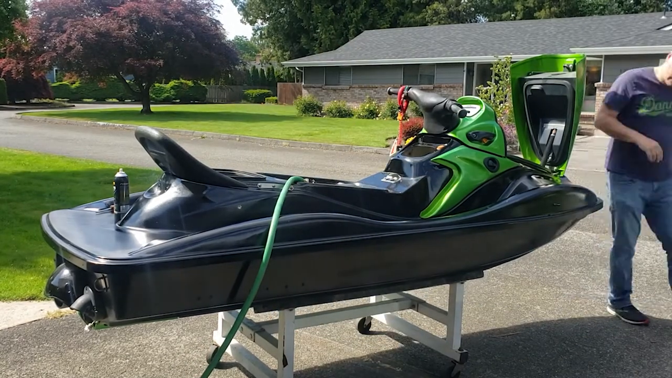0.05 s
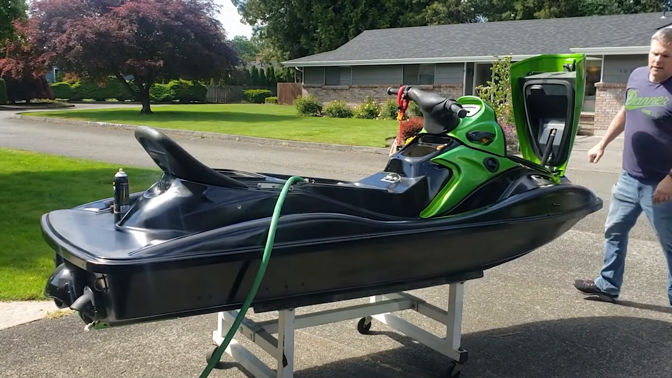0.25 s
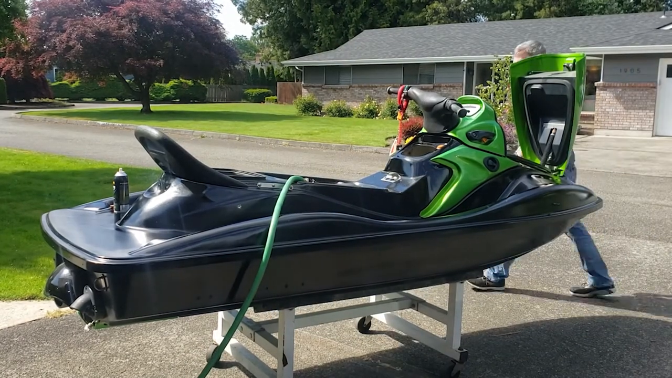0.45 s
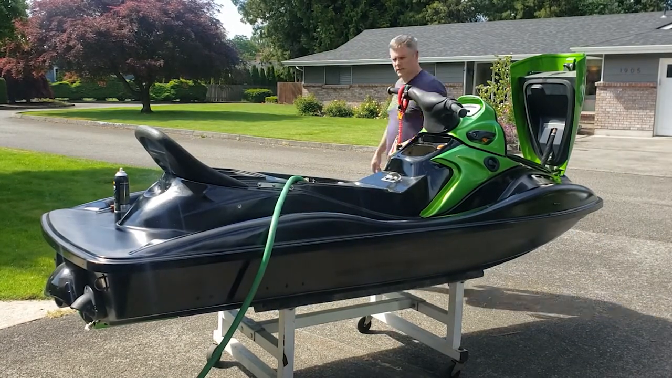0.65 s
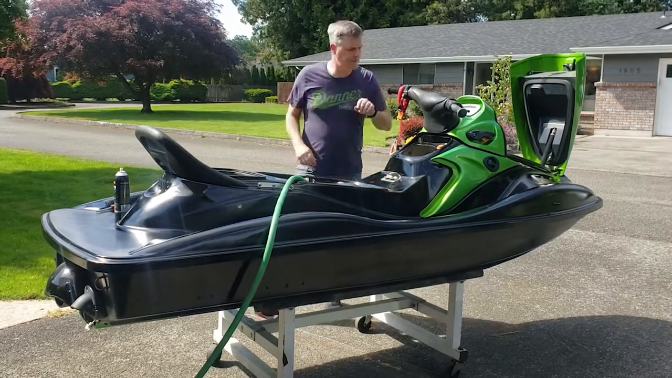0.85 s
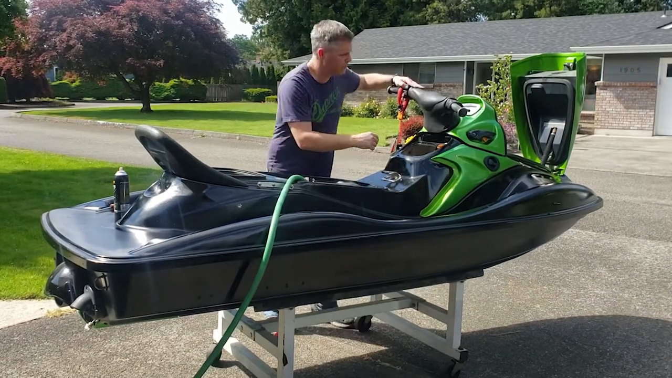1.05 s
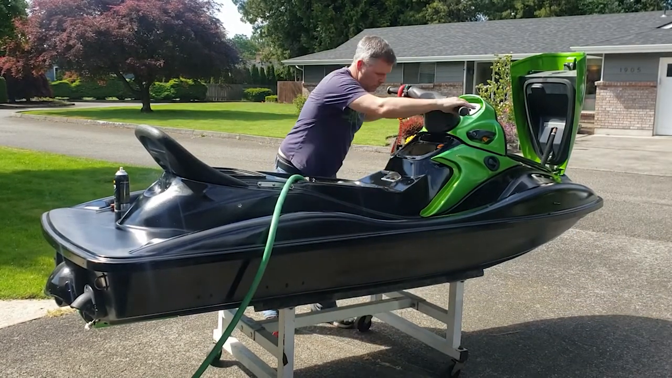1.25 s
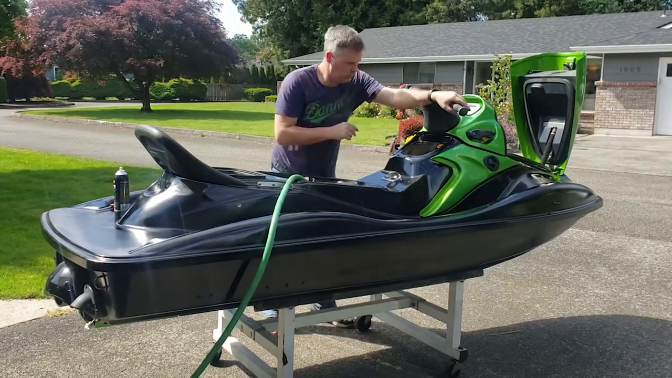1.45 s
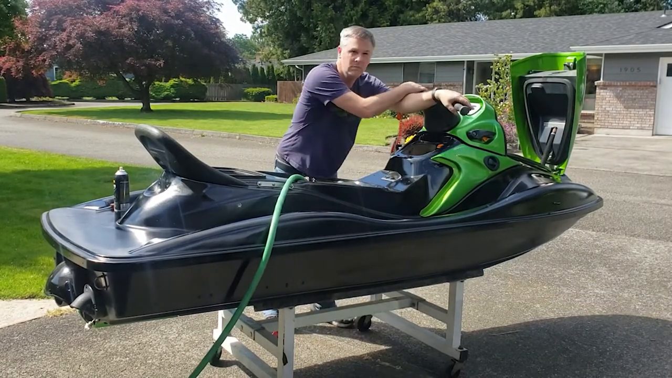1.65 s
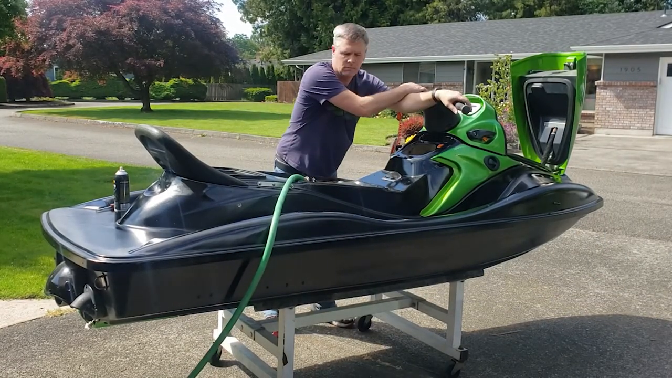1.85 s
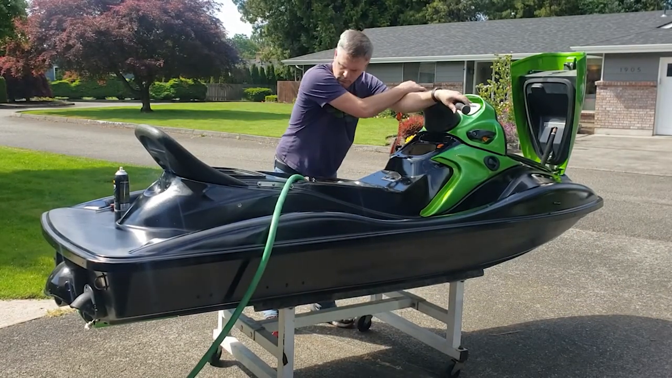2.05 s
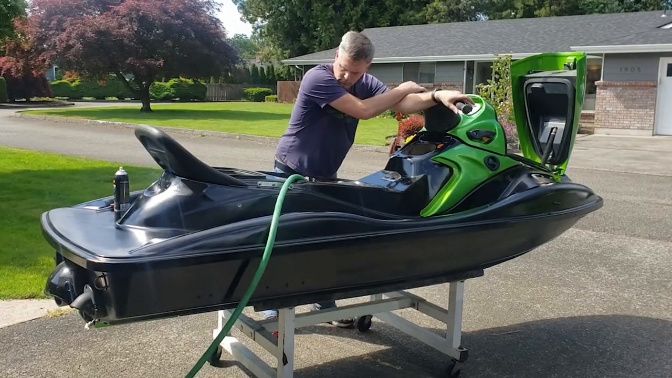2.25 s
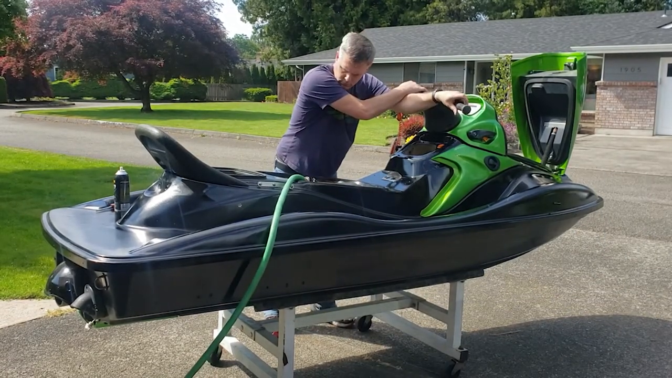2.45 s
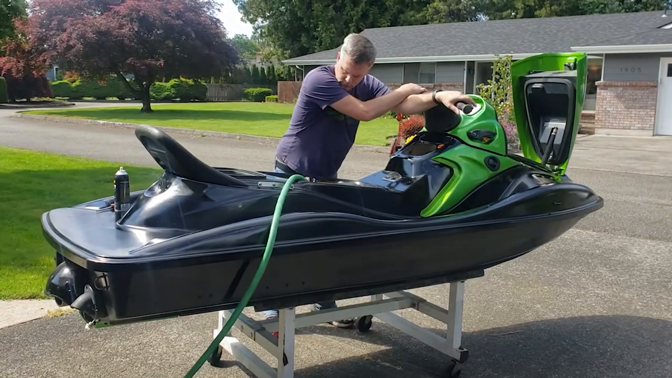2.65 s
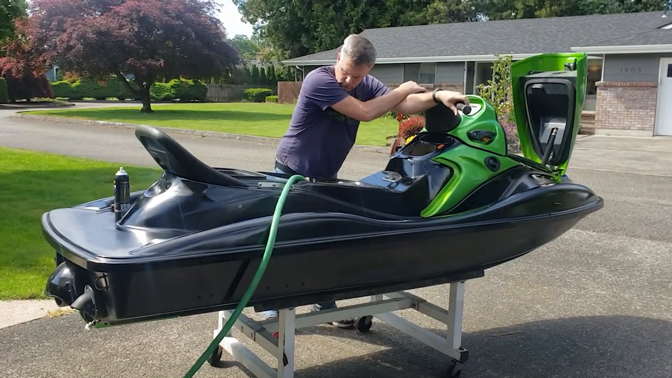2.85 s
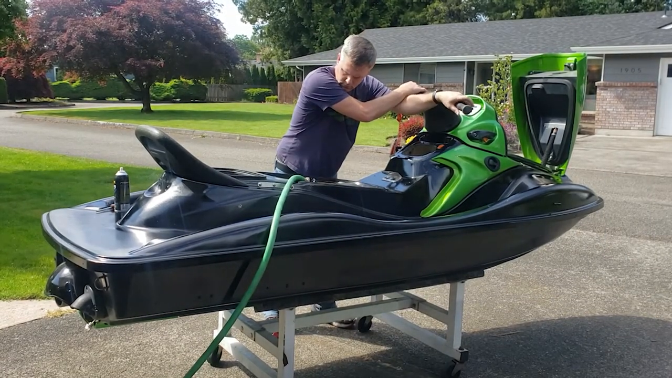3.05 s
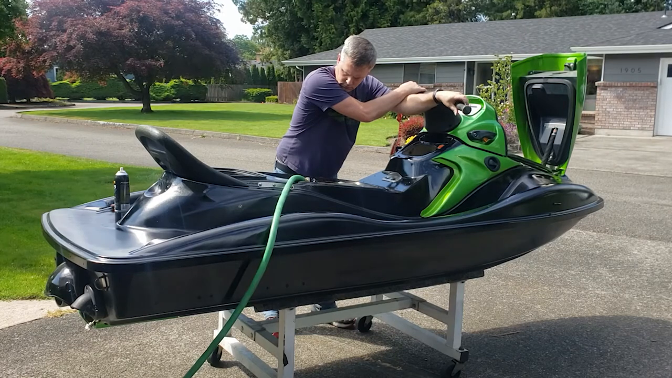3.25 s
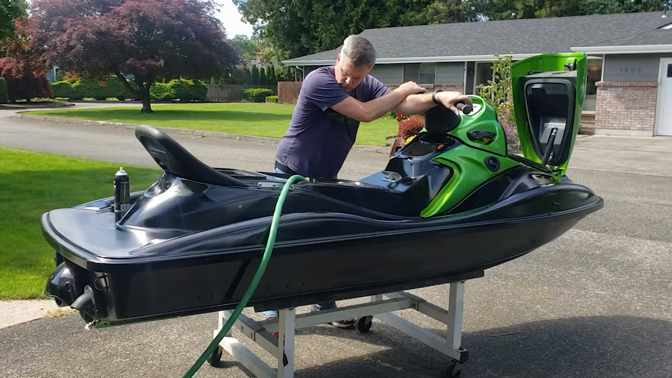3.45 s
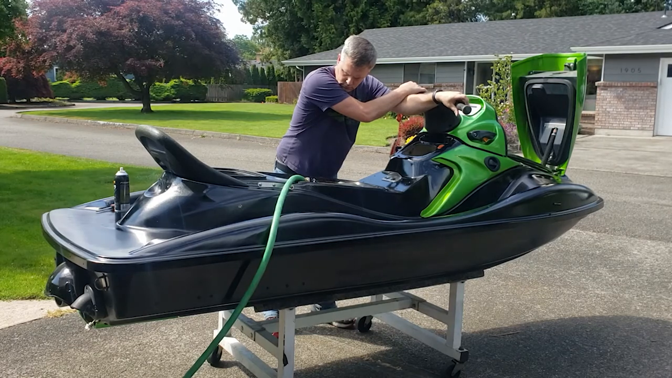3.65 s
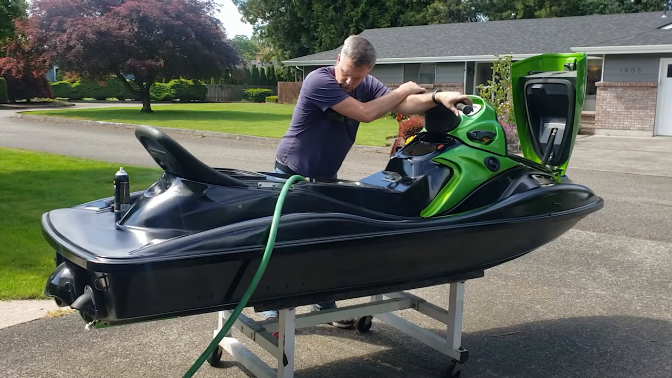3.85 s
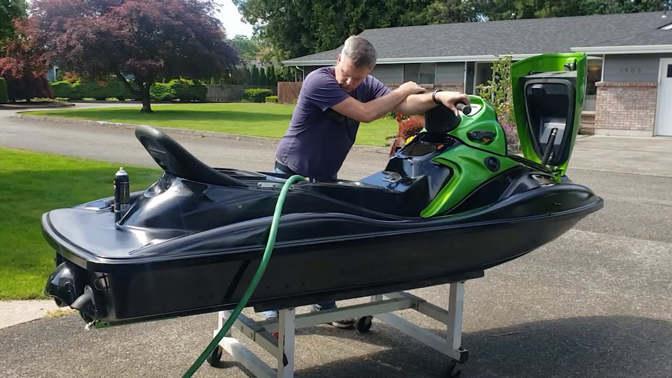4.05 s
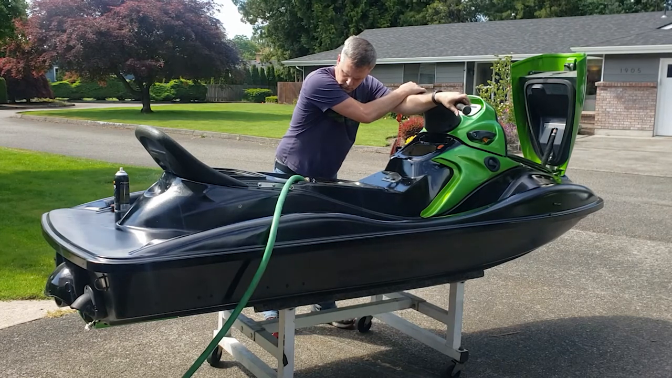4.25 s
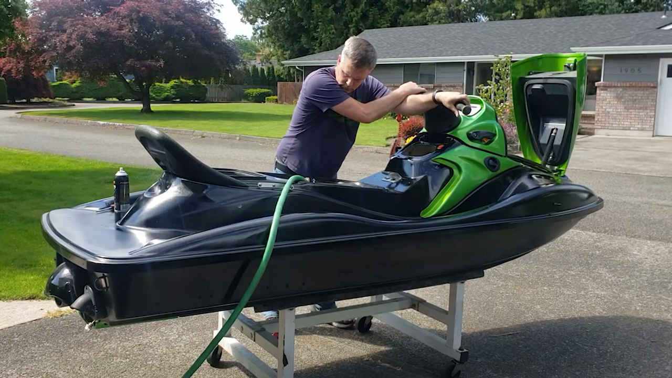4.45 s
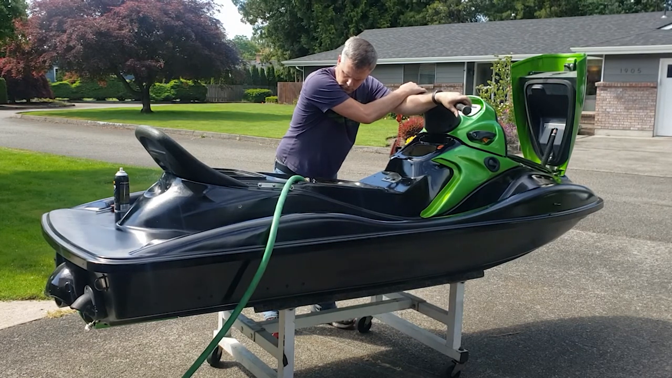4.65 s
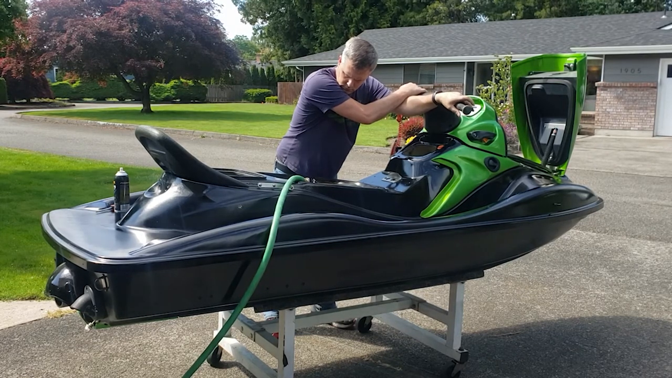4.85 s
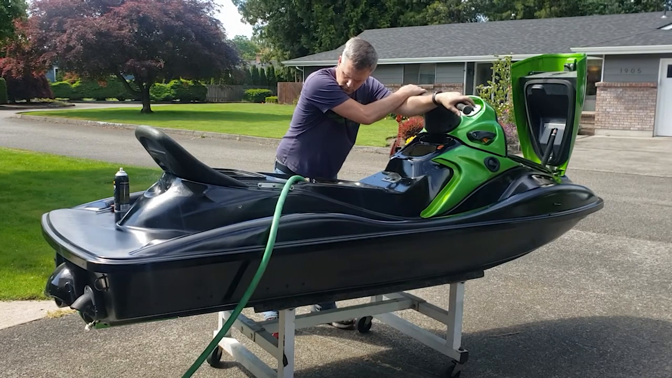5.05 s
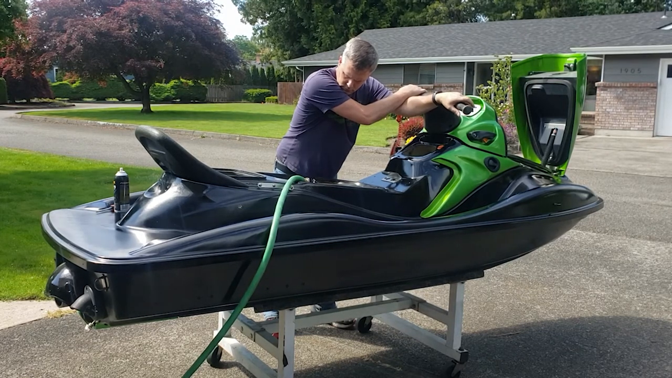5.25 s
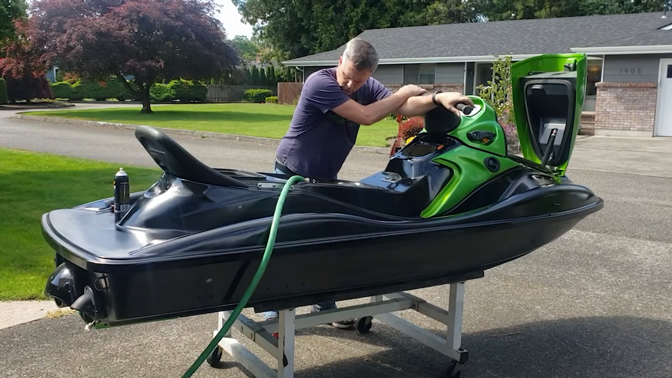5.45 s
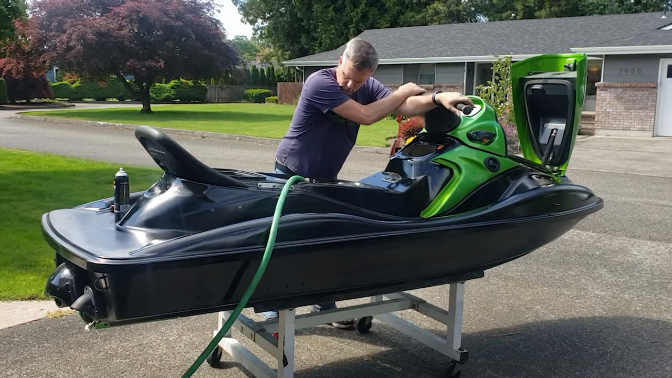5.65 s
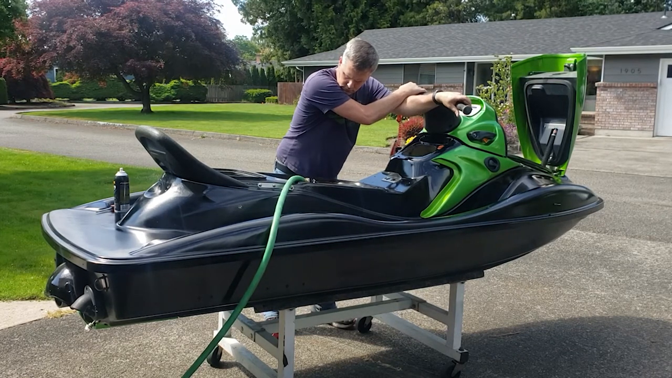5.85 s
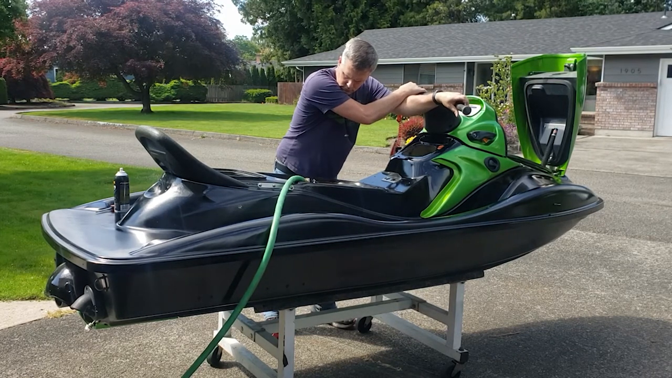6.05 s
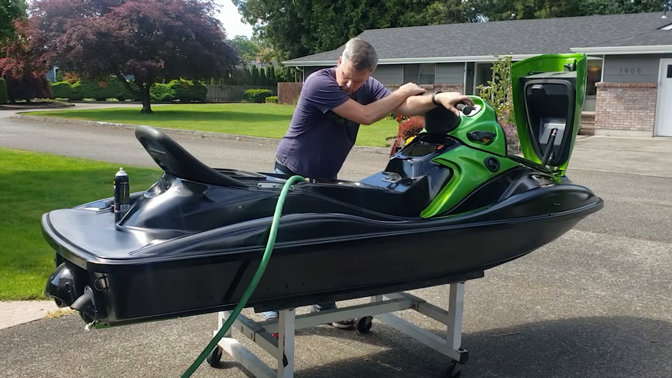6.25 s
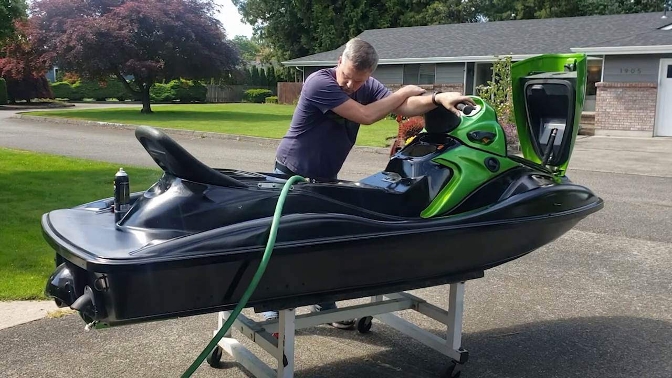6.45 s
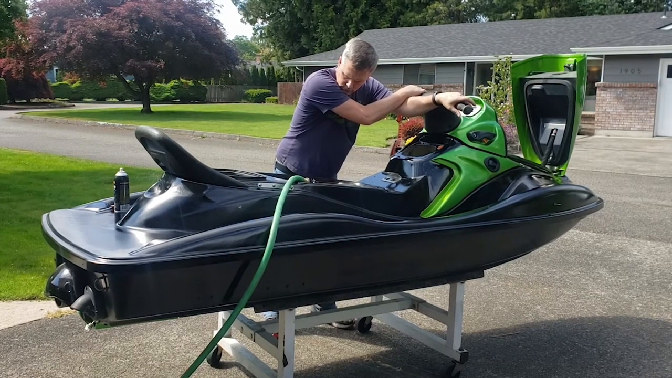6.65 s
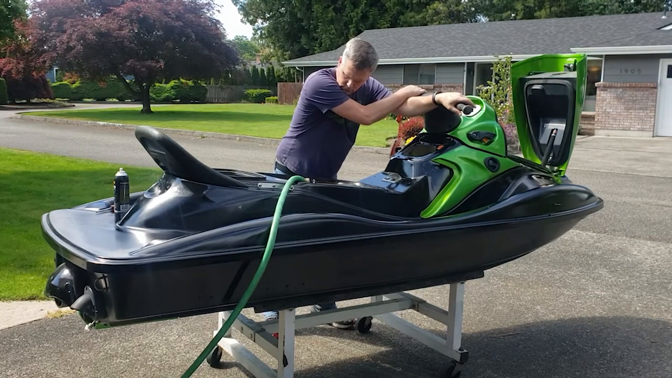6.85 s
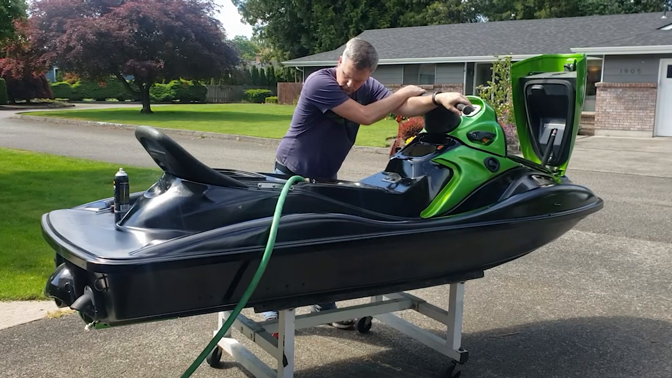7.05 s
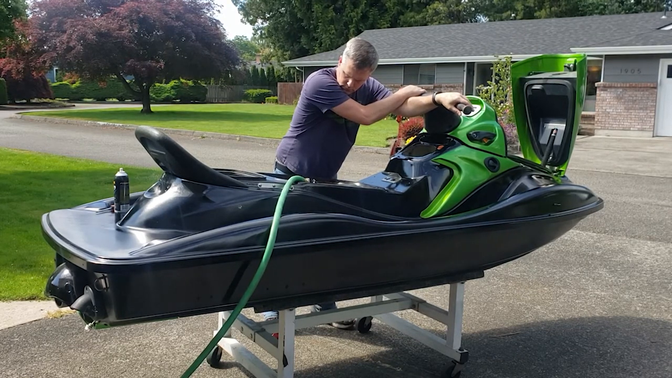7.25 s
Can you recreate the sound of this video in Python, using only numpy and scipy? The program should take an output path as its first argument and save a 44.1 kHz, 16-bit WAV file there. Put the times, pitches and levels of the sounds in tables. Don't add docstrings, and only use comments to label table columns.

```python
import sys
import numpy as np
from scipy import signal
from scipy.fft import rfft, irfft, next_fast_len
from scipy.io import wavfile
from scipy.ndimage import uniform_filter1d

SR = 44100
rng = np.random.default_rng(int(sys.argv[2]) if len(sys.argv) > 2 else 0)


def invert_db(x):
    u = np.asarray(x, float) / 20
    return 10 ** u


def materialize(psi):
    bounded = np.clip(np.atleast_2d(psi).T, -1, 1)
    quanta = np.round(bounded * 32767).astype(np.int16)
    wavfile.write(sys.argv[1], SR, quanta)


N = 322364

T = np.arange(N) / SR
SLOW_T = T[::64]
HZ = np.fft.rfftfreq(next_fast_len(N + SR // 5, True), 1 / SR) + 1e-3
SIZE = 2 * len(HZ) - 2

# t/s, level/dB, half length/s
GUSTS = [
    (0.065, -44, 0.044),
    (0.196, -35.5, 0.025),
    (0.29, -36.5, 0.034),
    (0.52, -43.5, 0.15),
    (0.8, -42, 0.053),
    (0.958, -45.5, 0.068),
    (1.626, -38, 0.013),
    (1.96, -43.5, 0.027),
    (2.045, -45, 0.075),
]
# t/s, level/dB, half length/s
SCUFFS = [
    (.27, -77, 0.12),
    (.52, -82, .03),
    (.82, -81, 0.035),
    (.98, -80, 0.033),
]
# f/Hz, level/dB
HUM_SPECTRUM = [(71, -45), (120, -3), (203, -17.5), (330, -23.5), (428, -25), (1060, -28), (1470, -38.5),
                (3650, -52.5), (4120, -65), (15000, -65)]
# t/s, level/dB
HUM_DB = [(0, 2), (1, 3.5), (1.45, -7), (2.8, -4.5), (5.4, -3), (7.31, 0)]
# t/s, peak level/dB, centre f/Hz, t60/s
TICKS = [(0.141, -66, 1500, .04), (0.151, -51, 1760, 0.035), (0.168, -57, 2356, 0.035),
         (0.351, -55, 2180, 0.046), (0.519, -60, 1860, 0.044), (0.7885, -46.5, 2900, 0.06),
         (0.955, -40.5, 3500, 0.017), (0.9714, -57, 3390, 0.053), (1.0604, -35, 1780, 0.12),
         (1.2072, -22.5, 1980, 0.042), (1.4084, -47, 1790, 0.033), (1.5252, -58, 1950, 0.032),
         (1.67, -43, 1655, 0.043), (1.9784, -39, 1730, 0.075), (2.812, -59, 2400, 0.044),
         (5.1686, -47, 2200, 0.036), (5.605, -34.5, 1850, 0.058), (6.22, -26, 1760, 0.047),
         (1.723, -35, 1433, 0.035), (2.043, -30, 2730, 0.051), (2.815, -34.5, 1500, 0.095),
         (6.181, -24.5, 1250, 0.18), (6.235, -20, 1196, 0.053)]
# t/s, peak level/dB
SPITS = [(0.1396, -69), (0.1511, -58), (0.1674, -58), (0.3526, -62), (0.5184, -64), (0.7884, -55),
         (0.954, -52), (1.5244, -87), (1.7045, -47), (1.7225, -42.5), (1.7928, -39.5), (1.8422, -39.5),
         (1.8891, -38), (2.0702, -48), (2.2044, -39), (3.0634, -34), (3.165, -38), (5.1692, -37.5),
         (5.1944, -47), (5.7453, -44), (5.9873, -39.5)]

# t/s, angle/turns
TURNS = [(1.06, 0), (1.208, 3), (1.725, 11), (1.892, 14), (2.046, 17), (2.167, 19), (2.434, 23),
         (2.609, 26), (2.909, 31), (3.398, 41), (3.492, 43), (4.269, 59), (4.361, 61), (4.454, 63),
         (4.936, 73), (4.995, 74), (5.049, 75), (5.155, 77), (5.6, 83.3), (5.738, 85), (5.821, 86),
         (6.081, 91), (6.6, 100.6), (6.87, 106.2), (7.05, 110.14), (7.35, 116.59)]
# on t/s, off t/s, level/dB, spin-up/s, coast for 30 dB/s
CRANKS = [
    (1.054, 1.307, -1, .05, 0.0787),
    (1.668, 1.915, -7, .05, .05),
    (1.978, 2.665, -3, .08, .075),
    (2.81, 4.99, 0, .04, 0.4153),
    (5.605, 6.1, -1, .27, 0.2),
]
# on t/s, off t/s, level/dB, spin-up/s, coast for 30 dB/s
KICKS = [
    (1.4, 1.404, -8, 0.0073, 0.048),
    (5.153, 5.194, -1.5, 0.042, 0.11),
    (5.757, 5.805, -4, 0.0095, 0.05),
]
# on t/s, off t/s, level/dB, spin-up/s, coast for 30 dB/s
BURNS = [
    (1.105, 1.14, -5.5, 0.0068, 0.25),
    (1.19, 1.26, -3, 0.007, 0.14),
    (2.05, 2.075, -6.5, 0.019, 0.026),
    (6.095, 7.4, -0.5, 0.018, .1),
    (6.2, 6.29, -0.5, 0.0069, .2),
]
# t/s, depth level/dB, half length/s
STUMBLES = [
    (3.462, 8.5, 0.014),
    (4.33, 4.5, 0.018),
    (4.981, 1.5, 0.032),
    (5.135, 3.5, .015),
    (5.795, 6, 0.012),
    (6.026, -0.5, 0.022),
]
CRANK_DB = [-33, -34.5, -41.5, -52]
BURN_DB = [-26.5, -31, -37, -45.5]
LAG_DB = [21.5, 19.4, 5.7, 14]
COAST = [1.37, 1, 1.05, 1.22]
STUMBLE_SHARE = [0.061, 0.91, 1.14, 1.1]
SHAKE = [0.44, 0.5, 0.33, 0.89, 0.72]
PUFFS_DB = [2, -1, 0.5, -0.5, -37, -1, 1, -11, -6]
# f/Hz, width/Hz, level/dB
COLD_PIPE = [(63.4, 23, -7.5), (86.6, 37, -8.5), (96.3, 18, 6), (109, 10.7, 5)]
# f/Hz, width/Hz, level/dB
HOT_PIPE = [(51, 13, -28), (121, 33, -7)]
# f/Hz, width/Hz, level/dB
HULL = [(158, 21, -6), (198.3, 13.3, -5.5), (228, 19.4, 0), (252.7, 16.7, 0), (281, 19.2, -5),
        (313.7, 5.3, -4.5), (343.2, 8.7, -4.5), (431, 102, -15.5)]
# order/shaft rate, level/dB
CHUG_ORDERS = [(1, -40), (2, -10), (3, 1.5), (4, 4.5), (5, 5), (6, -3), (7, -39), (8, -9.5), (9, -12),
               (10, -1), (11, -1.5), (12, -42), (13, -5.5), (14, -5.5), (15, -7), (16, -12.5), (17, -7),
               (21, -16.5), (26, -15), (32, -21.5)]
# order/shaft rate, level/dB
FIRING_ORDERS = [(1, -35.5), (2, -10), (3, 9.5), (4, -12), (5, 5.5), (6, -1.5), (7, -0.5), (8, -17),
                 (9, -34), (10, -7), (11, -8.5), (12, -0.5), (13, -32), (14, -16), (15, -7.5), (16, -5),
                 (17, -10.5), (18, -36), (19, -12), (20, -6.5), (21, -40), (22, -19), (23, -51), (24, -39),
                 (25, -10.5), (26, -47), (27, -29), (28, -6), (29, -12), (30, -9)]
# f/Hz, width/Hz, level/dB
CRANKED_CASING = [
    [(240, 4), (400, -29), (488, 3), (527, 5.5), (1020, -2.5), (1380, -4), (1880, -2), (2060, -6), (2760, -11), (3420, -16.5), (6420, -19.5), (7360, -20.5), (15600, -26.5)],
    [(530, 20, -1.5), (1119, 28, 5.5), (1413, 35, -11), (1897, 19, 16), (2600, 24, -3), (3120, 32, -46), (3823, 22, -5), (4100, 72, -11), (4216, 33, -7), (5254, 25, -45), (6050, 57, -1), (6800, 69, -4), (7470, 260, -4), (8650, 260, -8.5), (11500, 92, -7)],
]
# f/Hz, width/Hz, level/dB
RUNNING_CASING = [
    [(240, -29), (400, -5), (614, -2.5), (973, -8.5), (1280, -10), (1690, -14.5), (1880, -12.5), (2030, -15), (4440, -25), (6930, -26), (9410, -31.5), (11500, -28), (15600, -33.5)],
    [(1315, 42, 1.5), (1850, 13, 7), (1902, 13, 5.5), (2178, 12, 3), (2630, 66, -1), (4600, 38, -10.5), (5150, 64, -19), (5850, 17, -14.5), (5900, 30, -18), (6740, 21, -2.5), (7330, 26, -11), (6870, 87, -26), (8470, 19, -14), (8880, 58, -20), (12800, 54, -14), (11100, 36, -13), (11600, 21, -10), (12600, 87, -17), (13400, 48, -19), (13700, 31, -23)],
]
# multiple/mesh rate, level/dB
WHINE_ORDERS = [(2, -14), (3.15, 0), (3.998, -26), (6, -0.5)]
WHINE_DB = [-56, -61, -55.5, -50, -48.5]
WHINE_SAG = [.04, .03, .015, .04, .055]
# t/s, level/dB, from f/Hz, to f/Hz, length/s
SQUEALS = [(1.69, -50, 2330, 2385, 0.021), (1.76, -51, 2333, 2420, 0.019),
           (1.781, -46.5, 2610, 2725, 0.014), (1.771, -53, 1897, 1850, 0.07),
           (1.831, -54.5, 2290, 2348, 0.037), (1.999, -45.5, 1420, 1444, 0.02),
           (2.022, -46, 2526, 2393, 0.015), (2.064, -40.5, 1810, 1850, 0.017),
           (1.071, -51, 1725, 1850, 0.028), (1.083, -45, 2360, 2462, 0.049),
           (2.819, -48, 2420, 2496, 0.032), (5.084, -57, 4100, 4140, 0.05), (5.118, -56, 2980, 2927, 0.028),
           (5.165, -60, 2230, 2150, 0.041), (5.64, -58, 2523, 2600, 0.018), (5.658, -45, 1523, 1503, 0.029),
           (5.664, -56, 714, 844, 0.024), (5.688, -48, 1672, 1800, 0.022), (5.7, -51, 2303, 2330, 0.023),
           (5.733, -41, 2457, 2284, 0.025), (5.753, -46, 2170, 2010, .035), (5.76, -58, 1154, 957, 0.027),
           (5.786, -45.5, 2263, 2400, 0.019), (6.099, -44, 1930, 1850, 0.019)]
# t/s, level/dB
THUDS = [
    (1.128, -14.5),
    (1.142, -15.5),
    (1.168, -12),
    (1.19, -11),
    (1.26, -18),
    (1.345, -21),
    (1.371, -28),
    (2.075, -15.5),
    (2.588, -21),
]
# on t/s, off t/s, f/Hz, level/dB
BOOMS = [(1.129, 1.183, 112.7, -33), (1.241, 1.242, 106, -31), (1.308, 1.31, 101.3, -15),
         (2.076, 2.081, 128, -22.5), (6.109, 6.169, 109, -14), (6.252, 6.318, 107.3, -20),
         (6.336, 6.427, 106.4, -21), (6.413, 6.497, 116.5, -23.5), (6.567, 6.652, 118.6, -20.5),
         (6.674, 6.714, 115, -24.5), (6.774, 6.865, 112, -28.5)]
# t/s, peak level/dB, f/Hz
LABOURED_SLACK = [(2.128, -51, 2850), (2.1667, -41, 2720), (2.225, -42, 2700), (2.2989, -40, 2750),
                  (2.3406, -36, 2710), (2.3887, -42, 2710), (2.433, -40, 2670), (2.484, -41, 2780),
                  (2.536, -39, 2690), (2.595, -44, 2740), (2.6441, -48, 2350)]
# t/s, peak level/dB, f/Hz
STEADY_SLACK = [(2.8483, -54, 2480), (2.9082, -36, 2680), (2.9563, -39, 2720), (3.006, -35, 2920),
                (3.0565, -33, 2670), (3.1038, -42, 2660), (3.15, -38, 2520), (3.202, -37, 2760),
                (3.2494, -33, 2720), (3.299, -34, 2500), (3.3487, -35, 2730), (3.3963, -32, 2770),
                (3.4914, -40, 2800), (3.539, -56, 2890), (3.586, -33, 2800), (3.635, -34, 2780),
                (3.6839, -41, 2800), (3.7322, -37, 2930), (3.7812, -36.5, 2730), (3.8294, -39, 2720),
                (3.877, -40, 2680), (3.926, -37, 2740), (3.975, -38, 2730), (4.0237, -31, 2930),
                (4.0726, -40, 2720), (4.1224, -36.5, 2660), (4.169, -38, 2460), (4.219, -44, 2850),
                (4.269, -48, 2740), (4.36, -46, 2760), (4.4123, -52, 2440), (4.4507, -41, 3000),
                (4.5026, -45, 2680), (4.5487, -39, 2740), (4.5976, -36, 2470), (4.647, -40, 2780),
                (4.6925, -40, 2810), (4.7414, -35, 2650), (4.792, -36, 2800), (4.84, -38, 2670),
                (4.8905, -35, 2500), (4.9356, -40, 2560), (4.994, -49, 2730), (5.0477, -43, 2300),
                (5.1506, -55, 2430)]
# t/s, peak level/dB, f/Hz
LAST_SLACK = [
    (5.7197, -40, 2360),
    (5.8211, -37, 2400),
    (5.874, -33, 2380),
    (5.928, -33, 2610),
    (5.9798, -35, 2750),
    (6.0313, -41, 2730),
    (6.0797, -32, 2770),
]
# f/Hz, level/dB, delay/s, length/s, sag/(1/s)
SLACK_CASE = [
    (1480, 3.5, -0.0012, 0.02, 2),
    (1905, -1, 0.003, 0.027, 0),
]
# t/s, peak level/dB
CLACKS = [(2.1287, -49), (2.151, -33.5), (2.1645, -42), (2.206, -34), (2.225, -38), (2.2466, -46),
          (2.2675, -44), (2.298, -33.5), (2.3466, -34), (2.3638, -33), (2.3887, -37), (2.4325, -33),
          (2.483, -32.5), (2.5177, -35), (2.5364, -32), (2.5758, -53), (2.5948, -36.5), (2.6087, -46),
          (2.6442, -54), (2.6666, -56)]
# t/s, f/Hz, level/dB, t60/s
PINION_RING = [
    (5.215, 2923, -56.5, .62),
    (5.17, 4150, -61, .45),
]
# f/Hz, share/1
ALIKE = [(60, 1), (130, 1), (290, 0.98), (640, 0.94), (1410, 0.82), (3100, 0.36), (6820, 0.58),
         (15000, 0.31)]
# f/Hz, level/dB
LEFT_DB = [(60, -2.5), (110, 1), (200, 1.5), (380, 2.5), (700, 1), (1290, 4.5), (2380, 1), (4400, 1),
           (7200, 9), (9000, -4), (15000, -4.5)]

TOOTH_HZ = 2783
SETTLES_S = 6.86


def unit(x):
    return x / np.sqrt(np.mean(x ** 2))


def over_time(rows):
    s, *columns = np.transpose(rows)
    return [np.interp(T, s, column) for column in columns]


def over_hz(rows):
    hz, value = np.transpose(rows)
    return np.interp(np.log(HZ), np.log(hz), value)


def fine(rows):
    return np.array([np.interp(T, SLOW_T, row) for row in np.atleast_2d(rows)])


def bell(s, half_s):
    return np.exp(-((SLOW_T - s) / half_s) ** 2)


def after(s):
    return np.clip((SLOW_T - s) / 0.012, 0, 1)


def modes(rows):
    return sum((-1) ** k * invert_db(db) / (1 + 2j * (HZ - hz) / width_hz)
               for k, (hz, width_hz, db) in enumerate(rows))


def band(lo_hz, hi_hz, order=4):
    low_cut = 1 + (lo_hz / HZ) ** (2 * order)
    high_cut = 1 + (HZ / hi_hz) ** (2 * order)
    return (low_cut * high_cut) ** -.5


def through(x, response):
    return unit(irfft(rfft(x, SIZE) * response, SIZE)[:N])


def walk(rate_hz):
    hold = int(SR / rate_hz)
    levels = np.repeat(rng.standard_normal(N // hold + 1), hold)
    return unit(uniform_filter1d(levels, hold)[:N])


def recurring_noise(cycles, size, share):
    worn = rng.standard_normal(size)[(cycles % 1 * size).astype(int)]
    return np.sqrt(share) * worn + np.sqrt(1 - share) * rng.standard_normal(N)


def rasp(phase, rate_hz, clean):
    return (clean + walk(rate_hz)) * np.sin(phase) + walk(rate_hz) * np.cos(phase)


def yard():
    gust_gain = invert_db(-48) + sum(invert_db(db) * bell(s, half) for s, db, half in GUSTS)
    scuff_gain = invert_db(-94) + sum(invert_db(db) * bell(s, half) for s, db, half in SCUFFS)
    gust, scuff = fine([gust_gain, scuff_gain])
    port_response = modes([(58.8, 12.3, -9.5), (121.0, 20, -23.5)]) * band(22, 285)
    wind = through(rng.standard_normal(N), port_response)
    grains = rng.standard_normal(N) * invert_db(2 * walk(39))
    rustle = through(grains, modes([(2790, 650, 0), (7200, 1700, -7)]) * band(1500, 9500))
    hum = through(rng.standard_normal(N), invert_db(over_hz(HUM_SPECTRUM)) * band(142, 11500))
    hum_db = -60 + over_time(HUM_DB)[0] + 0.24 * walk(3.6)
    return gust * wind + scuff * rustle + invert_db(hum_db) * hum


def ticks():
    out, since = np.zeros(N), np.arange(SR // 5) / SR
    for s, db, hz, t60_s in TICKS:
        grit = rng.standard_normal(len(since))
        narrow = signal.lfilter(*signal.iirpeak(hz, 6, SR), grit)
        body = unit(signal.lfilter(*signal.iirpeak(hz, 1.5, SR), narrow))
        edge = unit(signal.lfilter(*signal.iirpeak(7000, 1.5, SR), grit))
        burst = (body + 0.018 * edge) * 1000. ** (-since / t60_s)
        out[int(s * SR):][:len(since)] += invert_db(db - 7.0) * burst
    return out


def spits():
    out, since = np.zeros(N), np.arange(SR // 10) / SR
    soles_end_s, t60_s, rise_s = 1.6, 0.04, 0.0052
    tilt = invert_db(-2.5 * np.log2(HZ / 6000))
    air = through(rng.standard_normal(N), band(2000, 12000, order=2) * tilt)
    grit = through(air, band(2000, 7500, order=3))
    envelope = 1000. ** (-since / t60_s) * np.clip(since / rise_s, 0, 1)
    for s, db in SPITS:
        at = int(s * SR)
        source = grit if s < soles_end_s else air
        out[at:][:len(since)] += invert_db(db - 2) * source[at:][:len(since)] * envelope
    return out


def effort(rows, lag_db, coast):
    power = 1e-14
    for on, off, db, spin_s, down_s in rows:
        short = np.clip(1 - (SLOW_T - on) / spin_s, 0, 1)
        fall_db = 30 * (np.clip(SLOW_T - off, 0, None) / down_s) ** 1.47
        gain = invert_db(db - np.outer(lag_db, short) - np.outer(coast, fall_db))
        power = power + (SLOW_T > on) * gain ** 2
    return np.sqrt(power)


def start_number(t):
    return np.searchsorted([row[0] for row in CRANKS[1:]], t)


def throb(turns, depth_db, size=160):
    sink = np.clip((turns % 1 - .12) / 0.77, 0, 1)
    gate = uniform_filter1d(invert_db(-depth_db * sink), size=size)
    return gate / np.sqrt(uniform_filter1d(gate ** 2, size=SR // 10))


def puffs(turns, scatter_db):
    slot = np.floor(3 * turns).astype(int)
    at = np.flatnonzero(np.diff(slot)) + 1
    size_chance, time_chance = rng.standard_normal((len(at), 2)).T
    late = (0.000411 * SR * scatter_db[at] * time_chance).astype(int)
    level_db = np.array(PUFFS_DB)[slot[at] % 9] + scatter_db[at] * size_chance
    pulses = np.zeros(N)
    pulses[np.clip(at + late, 0, N - 1)] = invert_db(level_db)
    return unit(pulses) + 1.3 * recurring_noise(turns / 3, size=6400, share=0.8)


def even_wave(turns, rows):
    angle = np.linspace(0, 1, 4097)
    wave = sum(invert_db(db) * np.sin(2 * np.pi * (k * angle + rng.random())) for k, db in rows)
    return np.interp(turns % 1, angle, wave)


def casing(body, ring_db, narrowest_hz):
    colour, resonances = body
    rows = [(hz, max(width_hz, narrowest_hz), db) for hz, width_hz, db in resonances]
    return [invert_db(over_hz(colour))] + [invert_db(ring_db) * modes(rows[k::3]) for k in range(3)]


def patchy(x, responses, ring, patchy_db):
    body, *sets = irfft(rfft(x, SIZE) * np.array(responses), SIZE)[:, :N]
    ringing = 0
    for one_set in sets:
        swell_db = patchy_db * (np.clip(walk(22), -2, 1.5) - 1.0)
        ringing = ringing + invert_db(swell_db) * one_set
    return unit(body + ring * ringing)


def clatter(turns, throb_db, responses, ring):
    responses = np.array(responses)
    knock_db = 1.04 * rng.exponential(size=N) + 1.58 * walk(80)
    knocks = recurring_noise(turns, size=2100, share=0.29) * invert_db(knock_db)
    rattle = knocks * throb(turns + 0.028, 0.47 * throb_db, size=350)
    hiss = knocks * throb(turns + 0.027, throb_db, size=1000) * invert_db(1.6 * walk(30))
    return np.array([patchy(rattle, responses * band(320, 4060), ring, 2.5),
                     patchy(hiss, responses * band(3540, 22000), ring, 4.5)])


def whine(turns, throb_db, dip_db):
    full_hz, from_hz, spin_scale, labour, rundown_per_s = 459, 340, 0.9, 1.25, .8
    slow = sum((SLOW_T > on) * np.exp(-np.abs(SLOW_T - on) / (spin_scale * spin_s))
               for on, _, _, spin_s, _ in CRANKS)
    rows = [(on, off, db, spin_s, down_s)
            for (on, off, _, spin_s, down_s), db in zip(CRANKS, WHINE_DB)]
    swell = invert_db(-3.4 * dip_db) * effort(rows, [8], [1.6])[0]
    slow, swell = fine([slow, swell])
    start = start_number(T)
    released_s = np.clip(T - np.array(CRANKS)[start, 1], 0, .4)
    hz = (full_hz - (full_hz - from_hz) * slow) * (1 - rundown_per_s * released_s)
    sag_depth = np.array(WHINE_SAG)[start] * (1 + labour * slow)
    sag = 1 + sag_depth * np.cos(2 * np.pi * (turns + .03)) - .01 + .008 * walk(150)
    phase = 2 * np.pi * np.cumsum(hz * sag) / SR
    stack = sum(invert_db(db - 3) * rasp(k * phase, 300 + 60 * k, .8) for k, db in WHINE_ORDERS)
    return swell * throb(turns, 1.4 * throb_db * (1 - slow)) * stack


def thuds():
    out, since = np.zeros(N), np.arange(SR // 8) / SR
    pipe_hz, t60_s = 112, 0.098
    kick = np.sin(2 * np.pi * pipe_hz * since) * 1000. ** (-since / t60_s)
    for s, db in THUDS:
        out[int(s * SR):][:len(since)] += invert_db(db) * kick
    return out


def boom():
    rise_s, coast_s = 0.006, 0.029
    hz, = over_time([((on + off) / 2, hz) for on, off, hz, _ in BOOMS])
    rows = [(on, off, db, rise_s, coast_s) for on, off, _, db in BOOMS]
    swell, = fine(effort(rows, [20], [1]))
    tone = np.sin(2 * np.pi * np.cumsum(hz * (1 + 0.0213 * walk(25))) / SR)
    return swell * invert_db(0.26 * walk(23)) * tone


def engine(cranked, running):
    turns, = over_time(TURNS)
    dip_db = sum(db * bell(s, half) for s, db, half in STUMBLES)
    crank = invert_db(np.c_[CRANK_DB]) * effort(CRANKS + KICKS, LAG_DB, COAST)
    fire = invert_db(np.c_[BURN_DB]) * effort(BURNS, LAG_DB, COAST)
    fire[0] *= invert_db(-9 * after(SETTLES_S))
    burn = fire[3] ** 2 / (fire[3] ** 2 + crank[3] ** 2)

    throb_db = 10 * (1 - burn) * np.array(SHAKE)[start_number(SLOW_T)]
    scatter_db = 4.5 + (5.5 - 4.5) * burn
    driven = effort([(on, off, 0, .01, .15) for on, off, *_ in CRANKS], [0], [1])[0]
    throb_db = throb_db * np.clip(driven + burn, .25, 1)
    steady_crank = after(2.88) - after(5.0)
    even = np.clip(0.25 + 0.57 * steady_crank + 0.62 * after(SETTLES_S), 0, 1)
    burn, throb_db, scatter_db, even = fine([burn, throb_db, scatter_db, even])
    cold_share, hot_share = np.sqrt(1 - burn), np.sqrt(burn)

    pulses = puffs(turns, scatter_db)
    steady = np.where(burn < .5, even_wave(turns, CHUG_ORDERS), even_wave(turns, FIRING_ORDERS))
    cold = through(pulses, -1j * modes(COLD_PIPE) * band(24, 101.0))
    hot = through(pulses, -1j * modes(HOT_PIPE) * band(38, 101.0))
    rough_pipe = cold_share * cold + 0.51 * hot_share * hot
    rough_hull = through(pulses, -1j * modes(HULL) * band(91, 660))
    rough_share, even_share = np.sqrt(1 - even), np.sqrt(even)
    pipe = rough_share * rough_pipe + even_share * through(steady, band(32, 120))
    hull = rough_share * rough_hull + even_share * through(steady, band(137, 670))
    hull = hull * throb(turns - .05, 1.1 * throb_db * (1 - burn))

    warming_ring = invert_db(-3.5 * (T < 6.7))
    high = 0.7 * cold_share * clatter(turns, throb_db, cranked, 0.78)
    high = high + hot_share * clatter(turns, throb_db, running, warming_ring)
    swells = np.hypot(crank, fire) * invert_db(-np.outer(STUMBLE_SHARE, dip_db))
    swells[:2] = uniform_filter1d(swells[:2], size=12)
    paths = (fine(swells) * np.array([pipe, hull, *high])).sum(0)
    return paths + boom() + thuds() + (1 - burn) * whine(turns, throb_db, dip_db)


def squeals():
    out = 0
    for rows in (SQUEALS[::2], SQUEALS[1::2]):
        hz, swell = np.zeros(N), np.zeros(N)
        for s, db, from_hz, to_hz, length_s in rows:
            u = np.arange(int(length_s * SR)) / (length_s * SR)
            hz[int(s * SR):][:len(u)] = from_hz + (to_hz - from_hz) * u
            swell[int(s * SR):][:len(u)] = invert_db(db - 3.0) * np.sqrt(np.sin(np.pi * u))
        out = out + swell * rasp(2 * np.pi * np.cumsum(hz) / SR, 300, 1.3)
    return out


def slack():
    out, since = np.zeros(N), np.arange(SR // 16) / SR
    level_db, hold_s, attack_s, spread = -9.5, 0.021, .003, 0.045
    envelope = np.exp(-(since / hold_s) ** 2) * np.clip(since / attack_s, 0, 1)
    sagging_s = (since * (1 - 0.58 * since))[:, None]
    rows = STEADY_SLACK + LABOURED_SLACK + LAST_SLACK
    chance = rng.random((len(rows), 3, 3))
    for (s, db, hz), (detune, phase, size) in zip(rows, chance):
        centre_hz = (hz + TOOTH_HZ) / 2
        pitch_hz = centre_hz * (1 + spread * (2 * detune - 1)) * np.array([1.03, 1, .94])
        cluster = np.sin(2 * np.pi * (pitch_hz * sagging_s + phase)).sum(1)
        out[int(s * SR):][:len(since)] += invert_db(db + level_db) * cluster * envelope
        for (case_hz, case_db, late_s, length_s, sag), d, g in zip(SLACK_CASE, detune, size):
            tone_hz = case_hz * (1 + 0.021 * (2 * d - 1))
            tone = np.sin(2 * np.pi * tone_hz * since * (1 - sag * since))
            tone = tone * np.sin(np.pi * np.clip(since / length_s, 0, 1))
            tone_db = (db - 39) / 2 + level_db + case_db - 7.7 * g
            out[int((s + late_s) * SR):][:len(since)] += invert_db(tone_db) * tone
    return out


def clacks():
    out, since = np.zeros(N), np.arange(SR // 10) / SR
    envelope = 1000. ** (-since / 0.027) * np.clip(since / 0.002, 0, 1)
    for s, db in CLACKS:
        hz = TOOTH_HZ * (1 + 0.047 * rng.standard_normal())
        ring = np.sin(2 * np.pi * hz * since) + 0.75 * np.sin(np.pi * 1.02 * hz * since)
        out[int(s * SR):][:len(since)] += invert_db(db) * ring * envelope
    return out


def pinion():
    return sum((T > s) * invert_db(db) * np.sin(2 * np.pi * hz * T) * 1000. ** (-np.abs(T - s) / t60_s)
               for s, hz, db, t60_s in PINION_RING)


def scene():
    cranked = casing(CRANKED_CASING, -4.5, 36)
    running = casing(RUNNING_CASING, -2.0, 30)
    gears = slack()

    def port():
        return rfft(yard() + ticks() + spits() + engine(cranked, running) + squeals() + gears + clacks(), SIZE)

    near, other = port(), port()
    alike = np.clip(over_hz(ALIKE), .18, 1) ** 2.0
    lead = np.exp(2j * np.pi * HZ * 6 / 44100)
    left_db = over_hz(LEFT_DB)
    tilt = invert_db(left_db / 2) / np.sqrt((1 + alike * lead.real) / 2)
    left = (alike * near + np.sqrt(1 - alike ** 2) * other) * lead * tilt
    right = near * tilt / invert_db(left_db)
    return irfft(np.array([left, right]), SIZE)[:, :N] + pinion()


def low_pass(x):
    return signal.sosfilt(signal.butter(12, 15760, fs=SR, output="sos"), x)


def record(dry):
    mix = irfft(rfft(dry, SIZE) * (HZ < 15780), SIZE)[:, :N]
    return low_pass(mix)


dry = scene()
out = record(dry)
materialize(out)
```